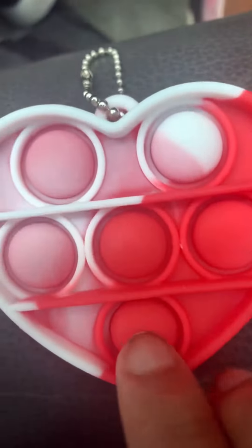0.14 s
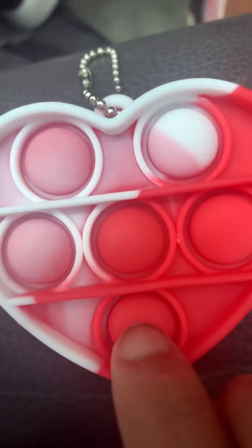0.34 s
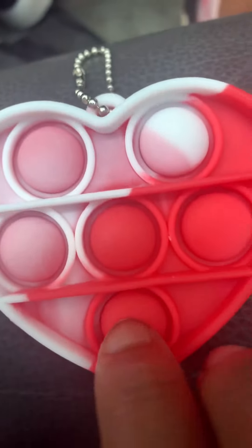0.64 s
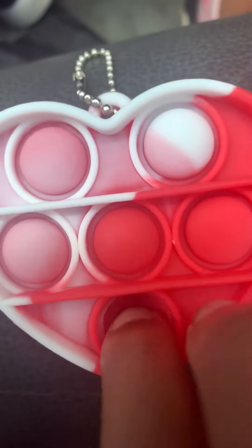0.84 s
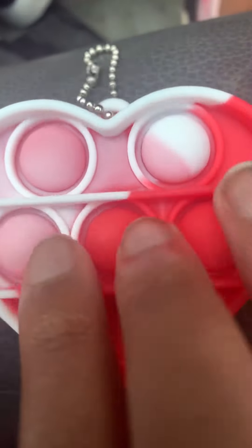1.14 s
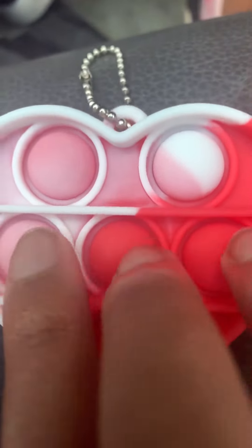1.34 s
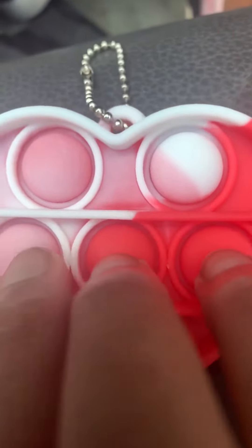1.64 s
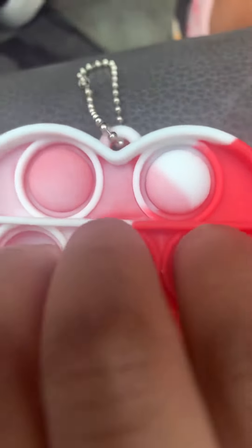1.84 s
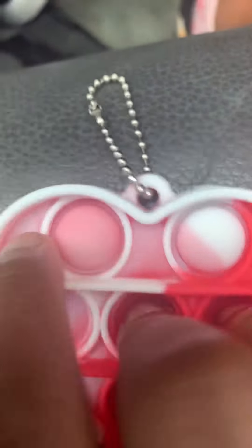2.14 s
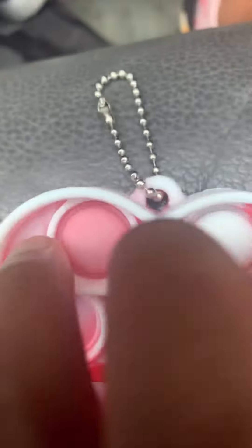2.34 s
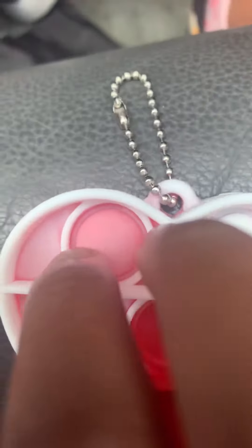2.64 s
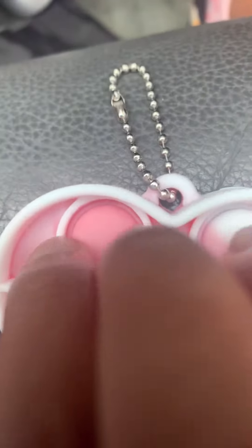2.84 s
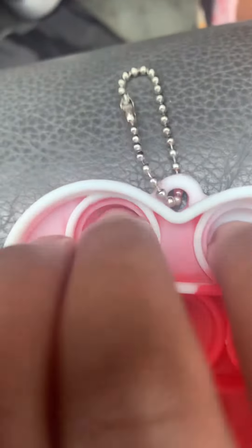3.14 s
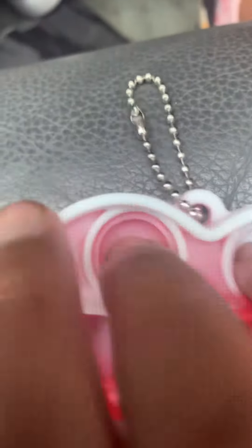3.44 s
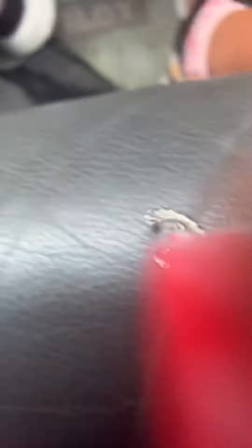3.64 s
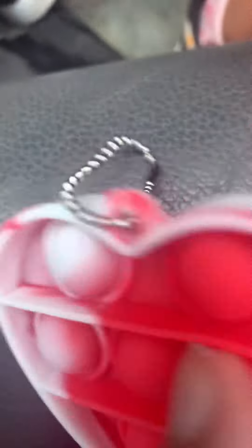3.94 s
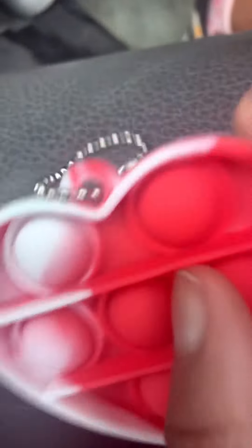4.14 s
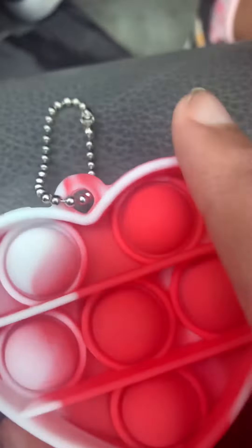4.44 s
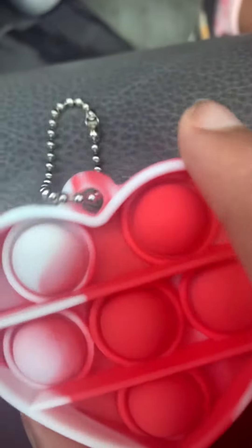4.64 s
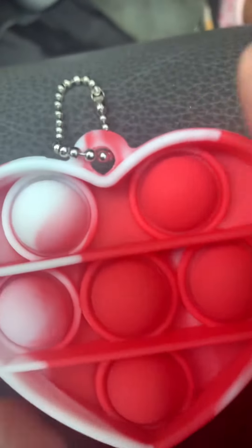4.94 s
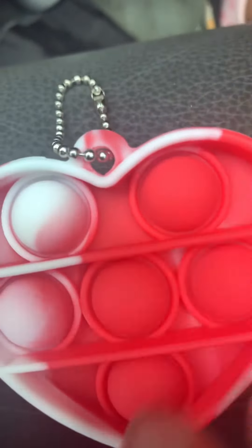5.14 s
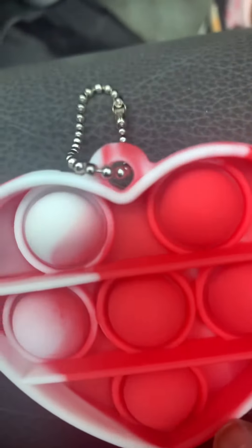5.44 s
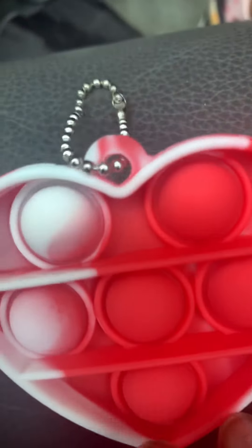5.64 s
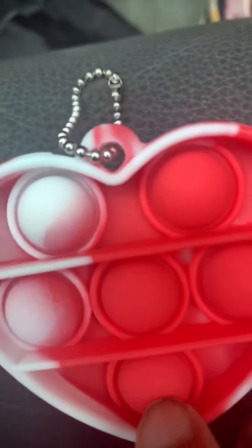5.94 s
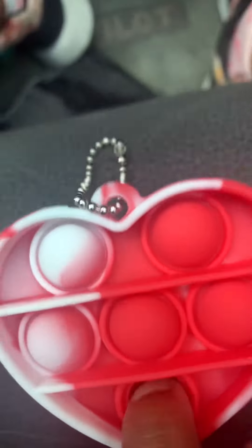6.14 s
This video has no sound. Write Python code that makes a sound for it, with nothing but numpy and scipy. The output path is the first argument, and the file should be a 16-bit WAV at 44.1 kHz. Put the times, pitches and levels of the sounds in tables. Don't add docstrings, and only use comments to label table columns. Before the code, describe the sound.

Close rubbery snaps of a fidget toy with small skin clicks and rustly handling, against the loud deep drone of an idling vehicle cabin.

```python
import sys
import numpy as np
from scipy import signal
from scipy.fft import rfft, irfft
from scipy.io import wavfile
from scipy.ndimage import uniform_filter1d

SR = 44100
rng = np.random.default_rng(int(sys.argv[2]) if len(sys.argv) > 2 else 0)


def convert_level_to_amplitude(level_db):
    exponent = np.asarray(level_db, float) / 20
    return 10 ** exponent


def generate_wav(sig):
    pcm = np.round(np.clip(np.atleast_2d(sig).T, -1, 1) * 32767).astype(np.int16)
    wavfile.write(sys.argv[1], SR, pcm)


N = 277389

# multiple of the cycle rate, level/dB
BOOM = [(1, -22.5), (2, -8.5), (3, 3), (4, -6), (5, -14.5), (6, -23), (7, -24), (8, -44.5)]
IDLE_HZ, NODE_HZ = 37.21, 168
IDLE_DB, SWAY_DB = -17.5, 0.43
# f/Hz, level/dB (rms)
BLOWER = [
    (24.5, -57),
    (92, -43),
]
# f/Hz, level/dB (per Hz)
AIR = [(150, -20.5), (190, -8.5), (270, -8.5), (350, -10.5), (590, -25.5), (710, -22.5), (1240, -31.5),
       (1570, -27.5), (1850, -33), (2860, -34), (4030, -41.5), (7600, -48), (11000, -57), (15000, -81)]
# f/Hz, level/dB (per Hz)
WHISTLE = [(6800, -30), (7300, -3), (7550, 0), (7800, -30), (9000, -70)]
# f/Hz, level/dB (per Hz)
RUMBLE = [(20, -30), (32, -13), (36.5, 8), (41, -3), (60, -7), (80, 0), (100, 2), (125, 1), (140, -3),
          (160, 0), (175, -9), (230, -25), (400, -70)]
AIR_DB, WHISTLE_DB, RUMBLE_DB = -40.5, -70, -29.5

# t/s (start), swell time/s, level/dB (peak)
SLIDES = [(3.647, .012, -60), (3.68, .015, -62), (3.845, .008, -65), (3.96, .025, -67), (4.1, .05, -69),
          (5.8, .008, -65)]
# t/s (start), swell time/s, level/dB (peak)
SHUFFLES = [(.88, .1, -57), (3.5, .07, -53), (3.844, .006, -41), (3.87, .05, -58), (4.07, .04, -51),
            (4.118, .006, -45), (5.804, .004, -46)]
# t/s (start), swell time/s, level/dB (peak)
BRUSHES = [(.035, .035, -61), (.165, .02, -64), (.245, .01, -68), (.293, .013, -63), (2.5, .07, -63)]
# t/s, level/dB (peak), brightness/dB
TICKS = [(0.0145, -11, -2.5), (1.3162, -25, -9.5), (2.639, -24.5, -3), (3.9615, -21, -4.5),
         (4.1945, -35.5, 7), (5.285, -15.5, -1), (6.2885, -28, -8.5)]
# t/s, level/dB (peak), f/Hz, t60/s
TAPS = [(0.9134, -27, 3300, .004), (1.1308, -30, 3280, 0.006), (3.4134, -36, 2750, 0.015),
        (3.657, -42.5, 5640, 0.021), (3.848, -22.5, 505, 0.026), (5.682, -37, 2400, 0.012),
        (5.8063, -22, 3000, 0.0044), (6.101, -46, 5030, 0.037), (6.198, -36.5, 1560, 0.042)]
# t/s, level/dB (peak)
BEADS = [(.95, -64), (1.11, -67), (3.19, -66), (3.723, -58), (3.899, -61), (4.098, -64), (4.141, -58),
         (4.154, -62.5), (4.174, -71), (5.661, -61.5), (5.68, -69), (5.818, -57.5), (6.156, -60.5)]
BEAD_HZ, BEAD_T60_S = 13500, 0.035

# t/s, level/dB
BUCKLES = [(.7406, -12), (1.7378, -12), (1.7627, -14), (3.0246, -10), (3.1322, -18)]
# t/s, wall level/dB, wall f/Hz, rim level/dB, crack top level/dB
POPS = [
    (0.7429, -7.5, 2460, -17, -38),
    (1.7414, -8, 2400, -15, -27),
    (1.7499, -5, 2600, -26, -23),
    (1.7654, -8, 2500, -9, -28),
    (3.0268, -14, 2610, -5, -22),
    (3.1332, -11, 2620, -16, -15),
]
# multiple of rim f, level/dB, t60/s
RIM = [(1, 0, .013), (1.06, -15, .045), (1.14, -9, .008), (.79, -10, .012)]
# t/s, level/dB, f/Hz
KNOCKS = [(.7428, -19, 600), (1.7413, -17, 600), (1.7499, -17, 600), (1.7655, -14, 540),
          (3.0266, -17, 1020), (3.1335, -14, 660)]
# delay/s, level/dB
SEAT = [(.004, -13), (.0075, -17), (.012, -27)]
WALL_T60_S, RIM_OVER_WALL, BUCKLE_HZ, BUCKLE_T60_S = 0.019, 1.56, 2660, 0.013
CRACK_DB, TAIL_DB = -8, -23.5
FULLER_WHEN_DULL = 0.16


def level(x, db):
    return x * convert_level_to_amplitude(db) / np.sqrt(np.mean(x ** 2))


def colour(x, points):
    size = 2 ** 19
    hz, db = np.transpose(points)
    log_hz = np.log(np.fft.rfftfreq(size, 1 / SR) + 1)
    log_gain = np.interp(log_hz, np.log(hz), db) * np.log(10) / 20
    cepstrum = irfft(log_gain)
    cepstrum[1:size // 2] *= 2
    cepstrum[size // 2 + 1:] = 0
    return irfft(rfft(x, size) * np.exp(rfft(cepstrum)))[:len(x)]


def walk(rate):
    hold = int(SR / rate)
    steps = np.repeat(rng.standard_normal(N // hold + 1), hold)
    return 1.51 * uniform_filter1d(uniform_filter1d(steps, hold), hold)[:N]


def decay(t, t60):
    return 1000.0 ** (-t / t60)


def ring(t, hz, t60):
    return np.sin(2 * np.pi * hz * t) * (1 - np.exp(-t / 0.00018)) * decay(t, t60)


def add(out, s, sound):
    i = int(s * SR)
    out[i:i + len(sound)] += sound[:len(out) - i]


def engine():
    wander = walk(3)
    hz = IDLE_HZ * (1 + 0.0012 * wander)
    wraps = np.diff(np.floor(np.cumsum(hz) / SR), prepend=0)
    thrusts = wraps * convert_level_to_amplitude(0.25 * walk(30))
    cabin = [(22, -70.5)] + [(k * IDLE_HZ, db) for k, db in BOOM] + [(420, -59), (900, -200)]
    earlier = int(20 * SR / IDLE_HZ)
    running = np.concatenate([thrusts[:earlier], thrusts])
    boom = rfft(colour(running, cabin)[-N:])
    boom *= np.tanh((NODE_HZ - np.fft.rfftfreq(N, 1 / SR)) / 5)
    return level(irfft(boom, N), IDLE_DB + 2) * convert_level_to_amplitude(SWAY_DB * wander)


def blower():
    t = np.arange(N) / SR
    return sum(np.sqrt(2) * convert_level_to_amplitude(db) * np.sin(2 * np.pi * hz * t + walk(1.2)) for hz, db in BLOWER)


def air():
    rush = 0
    edges_hz = [100, 450, 1200, 3200, 8000, 20000]
    for lo, hi in zip(edges_hz, edges_hz[1:]):
        bandpass = signal.butter(2, [lo, hi], "bandpass", fs=SR, output="sos")
        band = signal.sosfilt(bandpass, rng.standard_normal(N))
        rush = rush + band * convert_level_to_amplitude(0.45 * walk(1.5) + 0.55 * walk(10))
    rush = colour(rush, AIR)
    above = signal.sosfilt(signal.butter(4, 400, "highpass", fs=SR, output="sos"), rush)
    rush = rush * convert_level_to_amplitude(AIR_DB) / np.std(above)
    whistle = level(colour(rng.standard_normal(N), [(20, -94.5)] + WHISTLE), WHISTLE_DB)
    rumble = level(colour(rng.standard_normal(N), RUMBLE), RUMBLE_DB)
    return whistle + rush + rumble


def strokes(table):
    t = np.arange(N) / SR
    out = np.zeros(N)
    for s, swell, db in table:
        x = np.maximum(t - s, 0) / swell
        out += convert_level_to_amplitude(db) * (x * np.exp(1 - x)) ** 2
    return out


def rubbing():
    skin, rubber, brush = rng.standard_normal((3, N)) * convert_level_to_amplitude(2.5 * walk(300))
    skin = colour(skin, [(1500, -25), (4000, -8), (6000, 0), (9500, -1), (12000, -12), (15000, -40)])
    rubber = colour(rubber, [(400, -22.5), (1200, -8.5), (2500, 5), (3800, -5.5), (6000, -13), (12000, -49.5)])
    brush = colour(brush, [(2000, -20), (6000, 0), (10500, 0), (13500, -5), (16000, -18)])
    slides = level(skin, 5.5) * strokes(SLIDES)
    shuffles = level(rubber, 0) * strokes(SHUFFLES)
    return slides + shuffles + level(brush, 3) * strokes(BRUSHES)


def ticks():
    out, t = np.zeros(N), np.arange(4096) / SR
    for s, db, bright_db in TICKS:
        tone = [(300, -28.5), (1500, 0.5), (3000, -1), (6000, bright_db),
                (13000, bright_db - 9.5), (16500, bright_db - 36)]
        click = colour(1.0 * (t == 0), tone)
        add(out, s, convert_level_to_amplitude(db) * click / np.max(np.abs(click)))
    touches = TAPS + [(s, db, BEAD_HZ, BEAD_T60_S) for s, db in BEADS]
    noise = rng.standard_normal((len(touches), len(t)))
    rough = uniform_filter1d(uniform_filter1d(noise, size=50), size=50) * 10
    for (s, db, hz, t60), shake in zip(touches, rough):
        add(out, s, convert_level_to_amplitude(db) * ring(t, hz, t60) * (1 + 0.3 * shake))
    return out


def buckles(out, t):
    for s, db in BUCKLES:
        rim = convert_level_to_amplitude(-9) * ring(t, RIM_OVER_WALL * BUCKLE_HZ, 0.0075)
        add(out, s, convert_level_to_amplitude(db) * (ring(t, BUCKLE_HZ, BUCKLE_T60_S) + rim))


def knocks(out, t):
    for s, db, hz in KNOCKS:
        seat = convert_level_to_amplitude(-7.5) * ring(t, 485, 0.044) + convert_level_to_amplitude(-2.5) * ring(t, 330, 0.023) + convert_level_to_amplitude(-15.5) * ring(t, 1080, 0.016)
        add(out, s, convert_level_to_amplitude(db) * (ring(t, hz, 0.019) + seat))


def pops():
    out, t = np.zeros(N), np.arange(4096) / SR
    grit = rng.standard_normal((len(POPS), 2, len(t)))
    strike = np.minimum(t / 0.0011, 1) * decay(t, 0.015)
    bloom = (1 - np.exp(-t / 0.00067)) * decay(t, 0.068)
    for (s, wall_db, wall_hz, rim_db, top_db), (burst, wash) in zip(POPS, grit):
        wall = ring(t, wall_hz, WALL_T60_S) + convert_level_to_amplitude(-15) * ring(t, 2310, 0.055)
        wall += convert_level_to_amplitude(-8) * ring(t, 1680, 0.012) + convert_level_to_amplitude(-7) * ring(t, 2850, 0.012)
        rim_hz = RIM_OVER_WALL * wall_hz
        rim = sum(convert_level_to_amplitude(db) * ring(t, k * rim_hz, t60) for k, db, t60 in RIM)
        crack_tone = [(700, -27), (1700, 9), (2200, 2), (4500, -1), (7000, -4.5),
                      (10500, top_db), (13000, top_db - 9), (14500, top_db - 39)]
        crack = colour(burst * strike + 4 * (t == 0), crack_tone)
        crack_db = CRACK_DB - FULLER_WHEN_DULL * (top_db + 23)
        snap = convert_level_to_amplitude(wall_db) * wall + convert_level_to_amplitude(rim_db) * rim + convert_level_to_amplitude(crack_db) * crack
        tail_tone = [(400, 0), (2400, 3), (4200, 2 + 0.48 * rim_db), (7000, -9.5), (12000, -24), (16000, -58)]
        tail = colour(wash * bloom, tail_tone)
        add(out, s, snap + convert_level_to_amplitude(TAIL_DB) * tail)
        for delay, echo_db in SEAT:
            add(out, s + delay, convert_level_to_amplitude(echo_db) * snap)
    buckles(out, t)
    knocks(out, t)
    return out


def scene():
    return (engine() + blower() + air() + rubbing() + ticks() + pops())[None]


def roll_off(x):
    return signal.sosfilt(signal.butter(12, 15800, fs=SR, output="sos"), x)


def record(dry):
    rounded = np.tanh(0.8 * dry) / 0.74
    return roll_off(rounded)


dry = scene()
out = record(dry)
generate_wav(out)
```